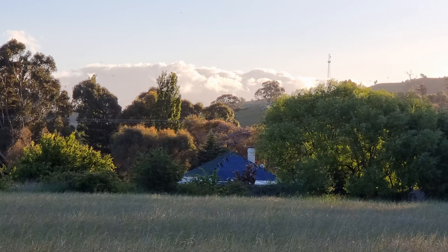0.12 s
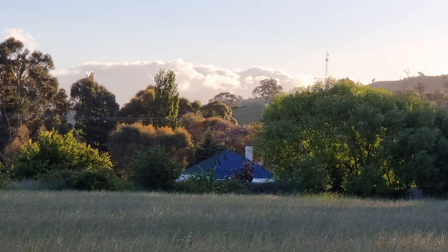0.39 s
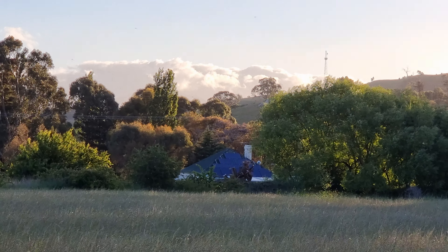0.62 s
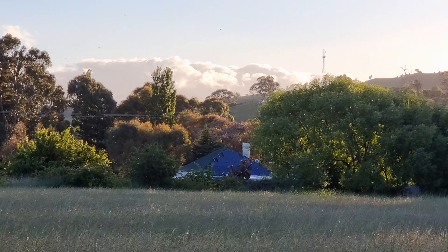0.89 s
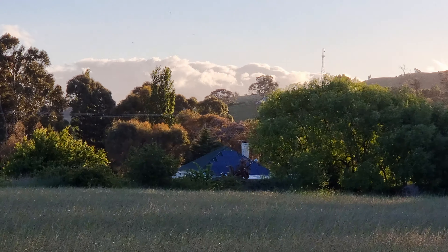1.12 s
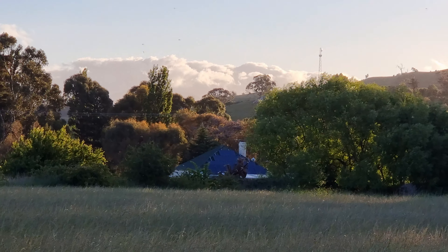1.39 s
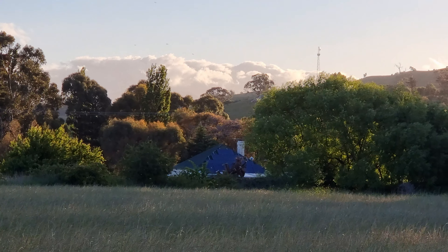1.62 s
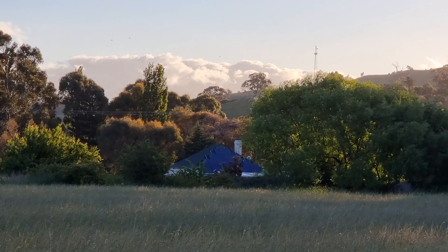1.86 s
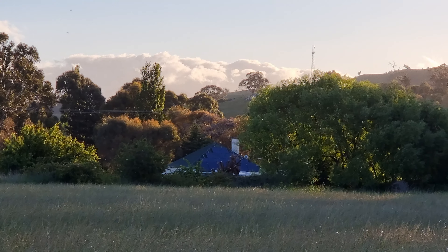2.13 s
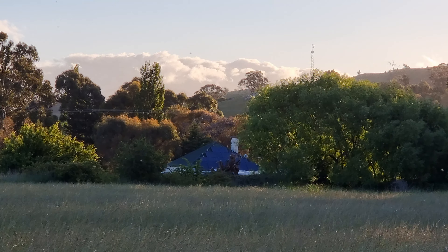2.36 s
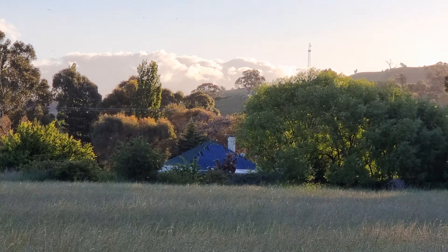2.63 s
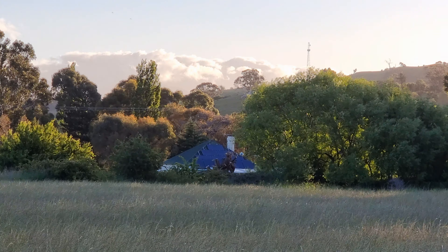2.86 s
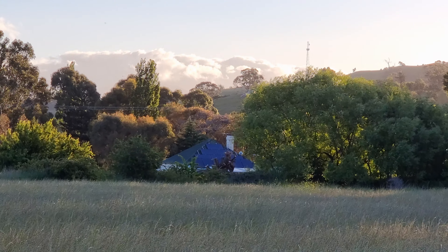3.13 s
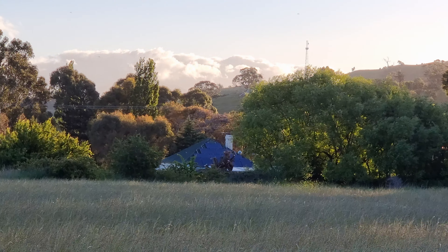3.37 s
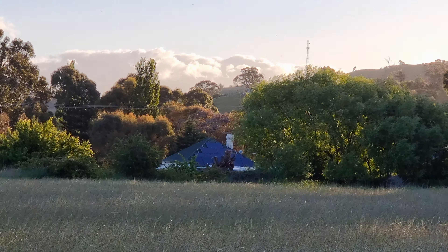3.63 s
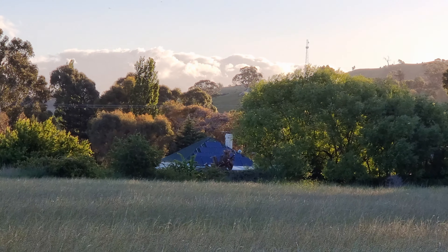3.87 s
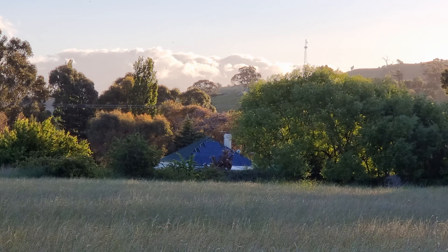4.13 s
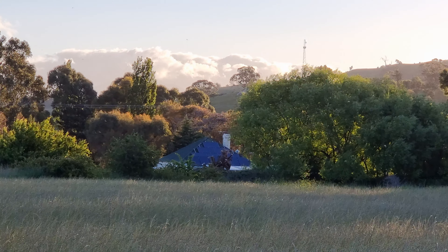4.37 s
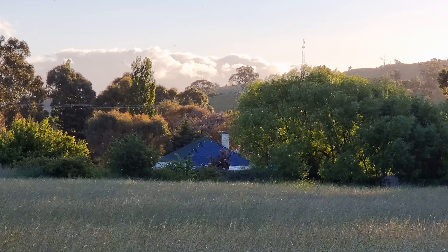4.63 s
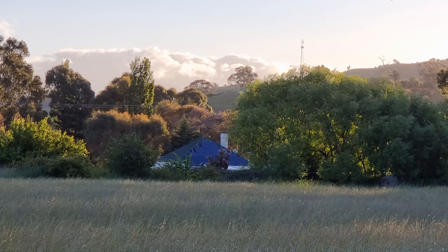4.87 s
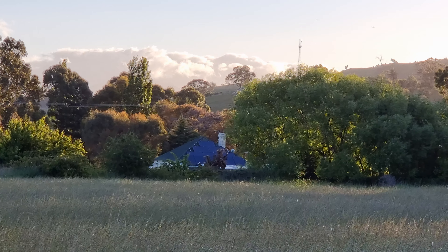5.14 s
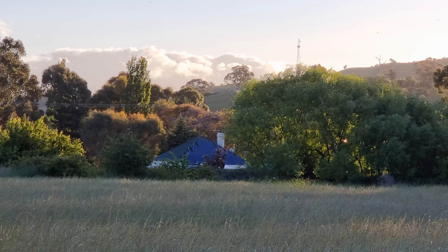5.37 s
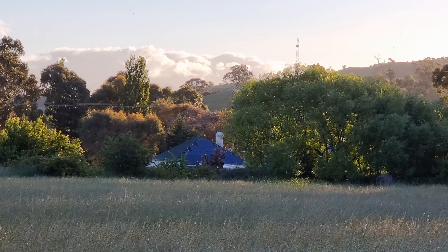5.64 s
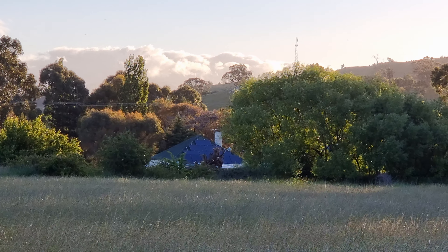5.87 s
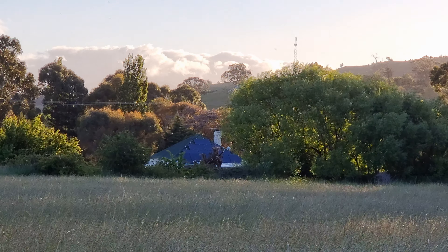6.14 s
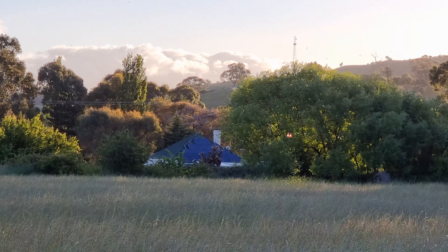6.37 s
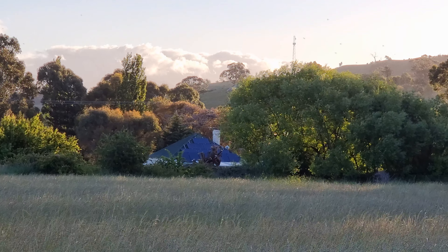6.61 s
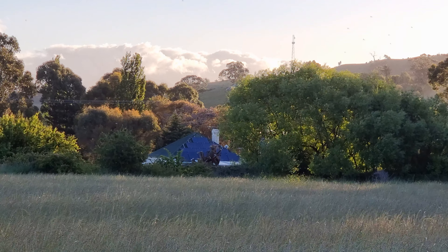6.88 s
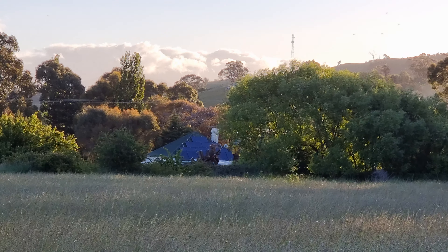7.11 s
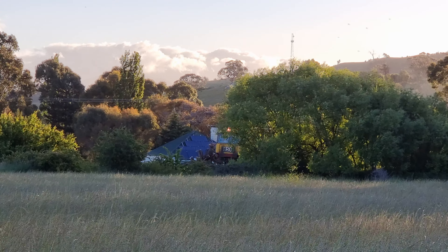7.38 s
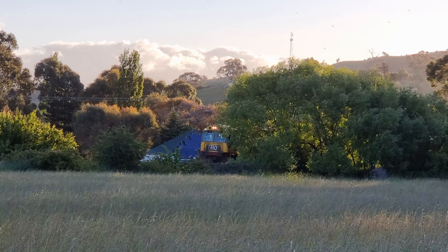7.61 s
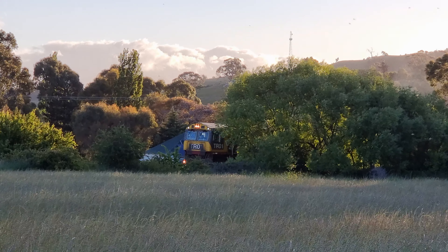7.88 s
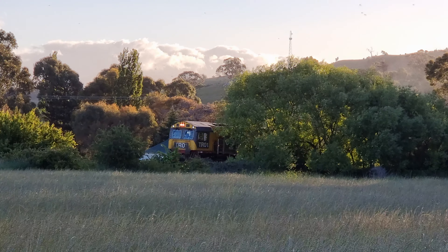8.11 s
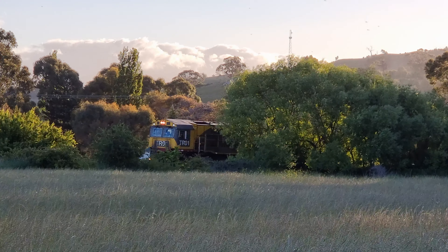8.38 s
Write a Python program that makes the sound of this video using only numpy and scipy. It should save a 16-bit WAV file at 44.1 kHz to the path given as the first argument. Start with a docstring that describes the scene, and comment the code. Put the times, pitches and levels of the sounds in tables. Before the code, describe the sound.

Outdoors across a wide grassy field, two hard-working diesel locomotives approach. Rapid, uneven exhaust firings blur into a deep throbbing drone, the rear engine slightly slower and wandering against the front one. Low rumble and a wavering gear tone lie beneath; a rough gassy roar swells and fades through trees. Around five seconds the roar opens and changes colour, then grows brighter. A small stereo camera microphone hears it from afar, with uneven treble.

```python
"""Two diesel locomotives at full load climb a grade across a wide field and slowly grow louder.
From the start uneven firings ring the exhausts, the rear engine runs slower and hunts; stack gas puffs and cracks
after each firing, over a gear drone, wavering crank orders, a sinking hum and a low rumble.
The hum stands out in spells from 4.5 s; near 5.3 s the engines leave the tree line and the roar changes colour.
Throughout, the two ports of a small camera colour the treble differently."""
import sys
import numpy as np
from scipy import signal
from scipy.fft import rfft, irfft, next_fast_len
from scipy.io import wavfile
from scipy.ndimage import uniform_filter1d, minimum_filter1d, map_coordinates

SR = 44100
rng = np.random.default_rng(int(sys.argv[2]) if len(sys.argv) > 2 else 0)


def file_out(sig):
    """Save sig as 16-bit WAV at sys.argv[1]."""
    # one column per channel
    cols = np.atleast_2d(sig).T
    # limit, then scale
    lim = np.clip(cols, -1, 1)
    pcm = np.round(lim * 32767).astype(np.int16)
    wavfile.write(sys.argv[1], SR, pcm)


def decibels_to_gain(level_db):
    """Convert a level in decibels to a linear amplitude gain (20 dB per decade)."""
    exponent = np.asarray(level_db, float) / 20
    return 10 ** exponent


N = 374850
TIME = np.arange(N) / SR
SIZE = next_fast_len(N + SR)
HZ = np.arange(SIZE // 2 + 1) * SR / SIZE + 1e-3  # offset keeps the logarithm finite

# Front crank speed. Each row: time in seconds, speed in turns per second.
FRONT_SPEED = [(0.0, 13.936), (1.0, 14.034), (2.0, 14.035), (3.0, 14.031), (4.0, 14.041), (5.0, 14.046),
               (6.0, 14.05), (7.0, 14.035), (8.5, 14.043)]
# Rear crank speed; its governor hunts. Each row: time in seconds, speed in turns per second.
REAR_SPEED = [(0, 13.76), (1, 13.75), (2, 13.66), (3, 13.61), (4, 13.55), (5, 13.57), (6, 13.78), (7, 13.8),
              (8.5, 13.76)]
# Mean firings of one crank turn. Each row: crank angle in degrees, strength in dB.
FIRINGS = [(76.0, -14.5), (98.8, -6.2), (141.3, -3.7), (156.8, -2.3), (196.6, -15.5), (278.1, 0.0),
           (331.2, -3.4), (351.0, -2.1)]
# Exhaust resonances. Each row: frequency in Hz, width in Hz, relative front level in dB, same for rear in dB.
PIPE = [(70.1, 9.5, 7.5, 3.5), (110.8, 15.35, 9.5, -2), (178.6, 18.4, 3, 2), (286.7, 6.7, -9.5, -19.5)]
# Exhaust level as the train comes nearer.
EXHAUST_START_DB, EXHAUST_DB_PER_S = -18, 0.49
# Bass delay at the left port against the right, shrinking as the train comes round to the front.
LAG_START_S, LAG_END_S = 1.3e-4, 4.5e-5

# Roar level before swells.
ROAR_BASE_DB = -25
# Centres of the roar ranges. Each entry: frequency in Hz.
ROAR_HZ = (1000, 1800, 3000, 5000, 8000)
# Once-a-turn surge of gas. Each entry: depth from 0 to 1, one per roar range.
THROB_DEPTH = (.24, .14, .07, .12, .15)
# How freely the roar passes trees and houses. Each row: time in seconds, level in dB.
CLEAR = [(0, 0.5), (.4, 2.5), (.85, -1), (1.25, 2.5), (1.55, 7.5), (2.1, 4.5), (2.75, 6), (3.3, 4.5),
         (4.1, -0.5), (4.55, 0), (5.2, -2.5), (5.75, -0.5), (6.3, 9.5), (6.55, 7), (6.85, 2.5), (7.25, 4),
         (7.5, 3.5), (7.75, 5.5), (8.0, 9.5), (8.5, 7)]
# Roar ranges. Each row: factor on the CLEAR level, start level in dB, gain in dB per second
# as the air path shortens.
RANGES = [(0.93, -0.45, 0.0931), (1.14, -1, 0.2443), (0.9, -8, 1.2856), (.35, -9.5, 1.75), (0.65, -22.5, 4)]
# Flares and sinks of single ranges, keyed by range centre in Hz.
# Each row: centre in seconds, length in seconds, change in dB.
FLARES = {1800: [(0, .3, 5), (1.7, .6, -9.5), (2.75, 0.17, 3.5), (7.5, 0.16, 7)], 3000: [(1.5, 0.2, 1.5),
          (4.45, 0.28, 3), (5.25, .3, 3.5), (6.6, 0.96, 4), (7.5, 0.26, 4.5)], 5000: [(2.05, 0.33, 4),
          (6.6, .6, 4.5), (7.55, .3, 2.5)], 8000: [(6.6, 0.99, 5), (7.6, 0.46, 1.5)]}
# Roar through the microphone ports. Each row: frequency in Hz, left level in dB, right level in dB.
PORTS = [(587, -20.5, -26.5), (720, -10.5, -6.5), (1076, -6, -15.5), (1305, -1.5, -7.5), (1738, -9.5, -8),
         (1910, -19.5, -16), (2690, -24.5, -11), (3112, -14, -8), (3840, -20, -25.5), (3900, -29, -27.5),
         (5290, -27.5, -23), (6170, -40, -58.5), (8700, -59, -56.5), (9600, -57.5, -57)]
# Narrow dips and peaks from the camera body.
# Each row: centre in Hz, Gaussian sigma in Hz, left change in dB, right change in dB.
DIPS = [(1482, 59, -7, -20), (1899, 61, -8, -20), (2084, 24, -9, -5.5), (2291, 80, -9.5, -18.5),
        (2720, 50, -2.5, -1.5), (3354, 110, -1.5, -8.5), (3880, 50, -2, -2), (4550, 350, 5, -5),
        (5105, 150, -12, -3), (6250, 150, -3, -2.5)]
# Between the ports. Each row: frequency in Hz, lead of the right port in radians, likeness from 0 to 1.
LEAD = [(300, 0, 1), (1000, 0, .98), (1250, .7, .96), (1420, .4, .92), (1470, 3, .92), (1750, 1.8, .98),
        (1930, 2.4, .9), (2250, -.5, .93), (2480, 1.5, .95), (3340, -.4, .9), (3440, 1.4, .85),
        (4400, 1.1, .85), (4800, 2.7, .55), (7000, 4.2, .6)]
# Colour change on leaving the tree line. Each row: frequency in Hz, change in dB.
OPEN = [(650, 1.5), (1000, 1), (1600, -0.16), (2050, 5), (2500, -4), (3000, 1), (3700, 3), (4700, -1.5),
        (6500, 1), (9000, -1.5)]
OPEN_S, OPENING_S = 5.33, 0.45  # midpoint and tanh time scale

# Steady gear tone. Entries: frequency in Hz, level in dB against the exhaust level curve.
GEAR = (229.35, -13)
# Crank orders that sing out of the roar. Each entry: multiple of the front crank speed.
HIGH_ORDERS = (49, 55, 59, 66)
# Their mean levels. Each entry: dB against the roar base plus the lowest range's swell.
HIGH_DB = (-21, -18, -25, -29)
HUM_START_HZ, HUM_HZ_PER_S = 444.5, -2.8
HUM_BED_DB, HUM_EDGE_S = -56.5, 0.057
# Spells where the hum stands out. Each row: start in seconds, length in seconds, added amplitude in dB.
HUM_SPELLS = [(4.546, 0.42, -43), (5.158, 0.37, -48), (5.953, 0.83, -45.5), (6.9, 0.33, -42),
              (7.45, .45, -38.5), (8.048, 0.19, -38.5)]

# Spectrum of rolling stock, fans and far echoes. Each row: frequency in Hz, relative density in dB per Hz.
RUMBLE = [(20, -20.5), (45, -5), (62, 0), (80, -4.5), (125, 0.5), (200, -7), (250, -5), (300, -10),
          (350, -17), (420, -26.5), (560, -22), (700, -36)]
RUMBLE_DB = -9  # against the exhaust level curve
# Swells of the upper rumble. Each row: centre in seconds, length in seconds, change in dB.
UPPER_SWELLS = [(0, 0.73, 5.5), (1.6, .9, -9), (3.4, 1.3, -7.5), (7.5, 1.6, 6)]
FLOOR_DB, SOUND_END_HZ = -83.5, 10250


def curve(table):
    """Columns of a time table, one value per sample."""
    seconds, *columns = np.transpose(table)
    return [np.interp(TIME, seconds, column) for column in columns]


def along(table):
    """Columns of a frequency table, one value per bin, on a log frequency axis."""
    hz, *columns = np.transpose(table)
    return [np.interp(np.log(HZ), np.log(hz), column) for column in columns]


def shape(x, response):
    """Filter by a complex response."""
    return irfft(rfft(x, SIZE) * response, SIZE)[..., :N]


def unit(x):
    """Scale to rms 1."""
    return x / np.sqrt(np.mean(x ** 2))


def walk(rate_hz):
    """Random levels held 1 / rate_hz and slewed twice; spread near 1."""
    hold = int(SR / rate_hz)
    steps = np.repeat(rng.standard_normal(N // hold + 1), hold)
    return 1.31 * uniform_filter1d(uniform_filter1d(steps, hold), hold)[:N]


def swells(table):
    """Sum of bell-shaped changes in dB; half a length from the centre each falls to 1/e."""
    return sum(db * np.exp(-4 * ((TIME - s) / length_s) ** 2) for s, length_s, db in table)


def crank():
    """Angle of the front crank in radians, the integral of its speed."""
    return 2 * np.pi * np.cumsum(curve(FRONT_SPEED)[0]) / SR


def firings(speed, scatter_db, scatter_deg):
    """A click per firing at its crank angle; no two burns are quite alike."""
    turn = np.cumsum(curve(speed)[0]) / SR
    turns = int(turn[-1])
    angle_deg, db = np.transpose(FIRINGS)
    chance = rng.standard_normal((2, turns, len(FIRINGS)))
    when = np.arange(turns)[:, None] + (angle_deg + scatter_deg * chance[0]) / 360
    place = np.interp(when.ravel(), turn, np.arange(N))
    strength = decibels_to_gain(db + scatter_db * chance[1]).ravel()
    # split each click between the two nearest samples
    share = place % 1
    samples = np.r_[place, place + 1].astype(int)
    return np.bincount(samples, np.r_[strength * (1 - share), strength * share], N + 2)[:N]


def exhaust(clicks, level_column):
    """Firings ring the pipe; the open stack radiates little deep bass and the silencer takes the treble."""
    ring = 0
    for k, row in enumerate(PIPE):
        s, damp = 1j * HZ / row[0], row[1] / row[0]
        resonance = damp * s / (1 + damp * s + s * s)
        ring = ring + (-1) ** k * decibels_to_gain(row[level_column]) * resonance  # neighbours in opposite phase
    s = 1j * HZ / 90
    stack = s * s / (1 + np.sqrt(2) * s + s * s)
    silencer = 1 / (1 + (HZ / 480) ** 4)
    return unit(shape(clicks, ring * stack * silencer))


def bass_at_ports(low):
    """The left port hears the bass late and slightly softer."""
    half_lag = np.linspace(LAG_START_S, LAG_END_S, N) * SR / 2
    return np.array([decibels_to_gain(-.2 * side) * map_coordinates(port, [np.arange(N) - side * half_lag], mode="mirror")
                     for port, side in zip(low, (1, -1))])


def turbo_whistle():
    """The turbocharger whistles far up in the treble, wavering in pitch and level."""
    level = decibels_to_gain(-16 + 4 * walk(9))
    hz = 9790 + 12 * walk(6)
    return level * np.sin(2 * np.pi * np.cumsum(hz) / SR)


def through_ports(shared, apart):
    """Spectra at both ports: each colours the treble, with its own phase and partly its own noise."""
    left_db, right_db = along(PORTS)
    for hz, sigma_hz, left, right in DIPS:
        bell = np.exp(-((HZ - hz) / sigma_hz) ** 2 / 2)
        left_db, right_db = left_db + left * bell, right_db + right * bell
    lead, alike = along(LEAD)
    alike = np.clip(alike, 0, 1)
    bass_cut = np.clip((HZ / 560) ** 3, 0, 1)
    ports = bass_cut * decibels_to_gain(np.array([left_db, right_db])) * np.exp(.5j * np.array([-lead, lead]))
    common = np.sqrt(alike) * rfft(shared, SIZE)
    own = np.sqrt(1 - alike) * rfft(np.array(apart), SIZE)
    return ports * (common + own)


def roar(clicks, swells_db):
    """Gas hiss puffs after each firing and the valve cracks; air and trees let each range through unevenly."""
    steady, puff_s, crack_db, shimmer_db = 2.6, .008, -12, 1.3
    puffs = signal.lfilter([1], [1, -np.exp(-1 / (puff_s * SR))], clicks)
    gate = steady + puffs / puffs.mean()
    # the engine housing smears each crack over some ms
    smear = rng.standard_normal(1500) * np.exp(-np.arange(1500) / 300)
    crack = decibels_to_gain(crack_db) * unit(signal.fftconvolve(clicks, smear)[:N])
    shared, *apart = (unit(gate * rng.standard_normal(N)) for _ in range(3))
    sound = through_ports(shared + crack + turbo_whistle(), apart)
    sound = sound * decibels_to_gain(ROAR_BASE_DB) / np.std(irfft(sound, SIZE)[:, :N])
    both = np.array([sound, sound * decibels_to_gain(along(OPEN)[0])])
    opened = (1 + np.tanh((TIME - OPEN_S) / OPENING_S)) / 2
    out = 0
    for k, db in enumerate(swells_db):
        band = np.interp(np.log(HZ), np.log(ROAR_HZ), np.eye(len(ROAR_HZ))[k])
        hidden, clear = irfft(band * both, SIZE)[..., :N]
        surge = 1 + THROB_DEPTH[k] * np.cos(crank())
        level = surge * decibels_to_gain(db + shimmer_db * walk(16))
        out = out + level * (hidden + opened * (clear - hidden))
    return out


def gear_drone(exhaust_db):
    """A gear drones at fixed pitch, its level wavering."""
    level = decibels_to_gain(exhaust_db + GEAR[1] + 2.0 * walk(3.3))
    return np.sqrt(2) * level * np.sin(2 * np.pi * GEAR[0] * TIME)


def crank_orders(swell_db):
    """High multiples of the front crank speed, each wavering in level."""
    out = np.zeros(N)
    for multiple, db in zip(HIGH_ORDERS, HIGH_DB):
        level = decibels_to_gain(ROAR_BASE_DB + swell_db + db + 2.8 * walk(3.7))
        out = out + np.sqrt(2) * level * np.sin(multiple * crank())
    return out


def sliding_hum():
    """A hum slides steadily down, earlier at the left port, and stands out in spells."""
    level = decibels_to_gain(HUM_BED_DB)
    for start_s, length_s, db in HUM_SPELLS:
        inside_s = np.minimum(TIME - start_s, start_s + length_s - TIME)
        level = level + decibels_to_gain(db) * np.clip(inside_s / HUM_EDGE_S + 1, 0, 1)
    hz = HUM_START_HZ + HUM_HZ_PER_S * TIME + .6 * walk(8)
    phase = 2 * np.pi * np.cumsum(hz) / SR
    ports = np.array([np.sin(phase + .7), np.sin(phase - .7)])
    return np.sqrt(2) * level * decibels_to_gain(1.5 * walk(7)) * ports


def rumble():
    """Low noise, nearly alike at both ports; its upper part comes and goes with the ground it crosses."""
    colour = decibels_to_gain(along(RUMBLE + [(SR / 2, -200)])[0])
    upper = np.clip((HZ - 320) / 80, 0, 1)
    noise = rng.standard_normal((2, N))
    lower_part = shape(noise, colour * (1 - upper))
    upper_part = decibels_to_gain(swells(UPPER_SWELLS)) * shape(noise, colour * upper)
    mid, side = lower_part + upper_part
    return unit(mid + 0.15 * side * np.array([[1], [-1]]))


def scene():
    """Both engines, their roar, the tones and the rumble."""
    exhaust_db = EXHAUST_START_DB + EXHAUST_DB_PER_S * TIME
    clear_db = curve(CLEAR)[0]
    roar_db = [share * clear_db + db + db_per_s * TIME + swells(FLARES.get(hz, []))
               for hz, (share, db, db_per_s) in zip(ROAR_HZ, RANGES)]
    front = firings(FRONT_SPEED, scatter_db=0.36, scatter_deg=0.58)
    rear = firings(REAR_SPEED, scatter_db=3.0, scatter_deg=2.5)
    rear_db = -12.5 + 2.5 * walk(1.5)
    engines = decibels_to_gain(1.0) * exhaust(front, level_column=2) + decibels_to_gain(rear_db) * exhaust(rear, level_column=3)
    low = bass_at_ports(decibels_to_gain(exhaust_db) * (engines + decibels_to_gain(RUMBLE_DB) * rumble()))
    gas = roar(front + rear, roar_db)
    return low + gas + gear_drone(exhaust_db) + crank_orders(roar_db[0]) + sliding_hum()


def limiter(x):
    """Ducks both channels briefly round peaks above 0.99."""
    room = np.minimum(1, .99 / (np.abs(x).max(axis=0) + 1e-9))
    return x * uniform_filter1d(minimum_filter1d(room, size=160), size=160)


def top_cut(x):
    """Nothing passes above the cut-off."""
    return signal.sosfilt(signal.butter(12, 15700, fs=SR, output="sos"), x)


def record(dry):
    """The sound ends near 10 kHz, a faint even noise floor lies under everything, the highest peaks are limited."""
    floor = rng.standard_normal(N) + .3 * rng.standard_normal((2, N))
    mix = limiter(shape(dry, HZ < SOUND_END_HZ) + decibels_to_gain(FLOOR_DB) * floor)
    return top_cut(mix)


dry = scene()
out = record(dry)
file_out(out)
```